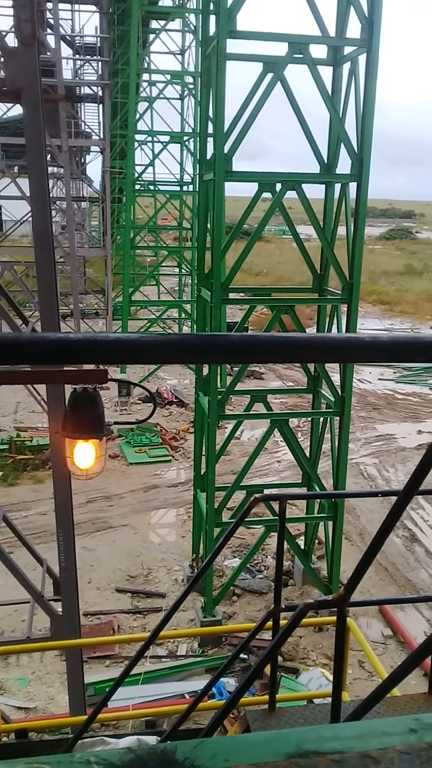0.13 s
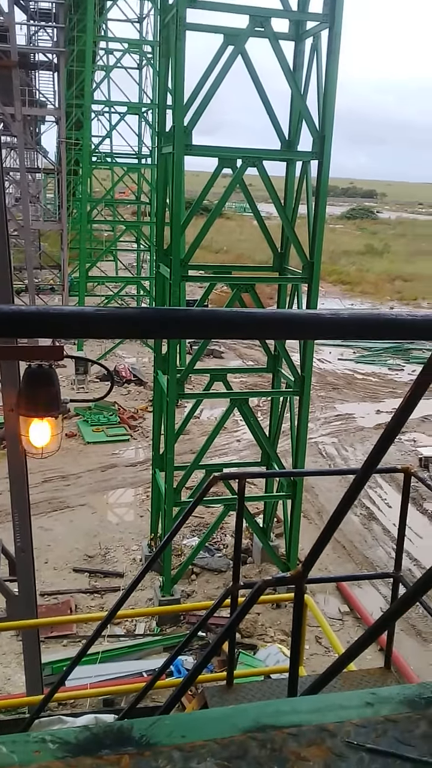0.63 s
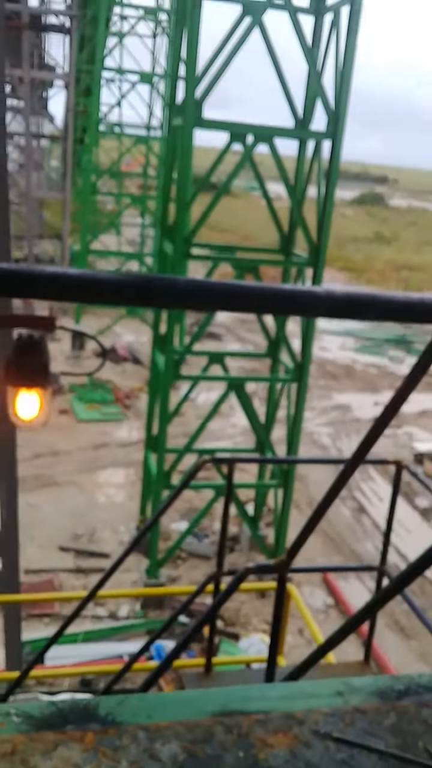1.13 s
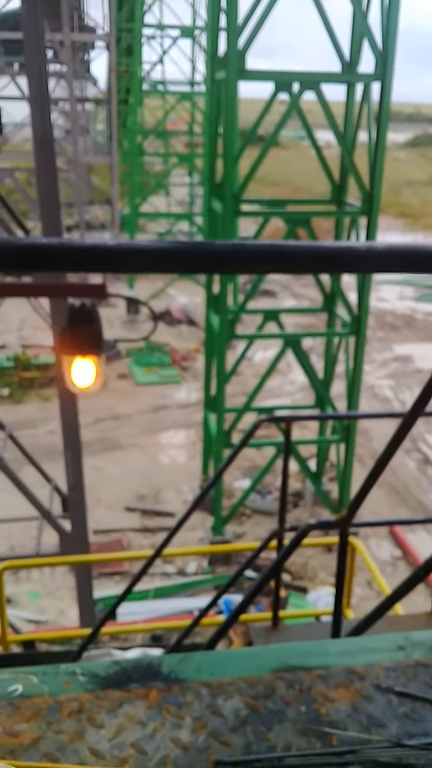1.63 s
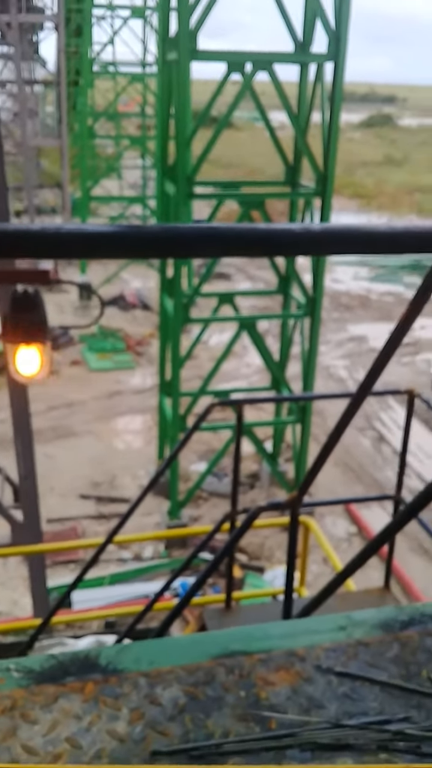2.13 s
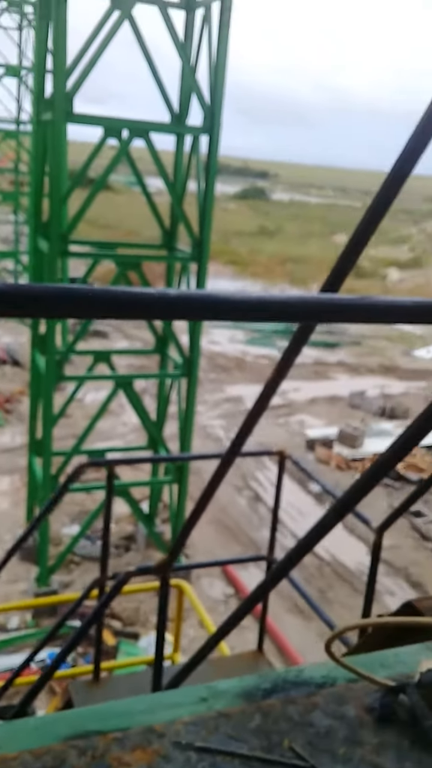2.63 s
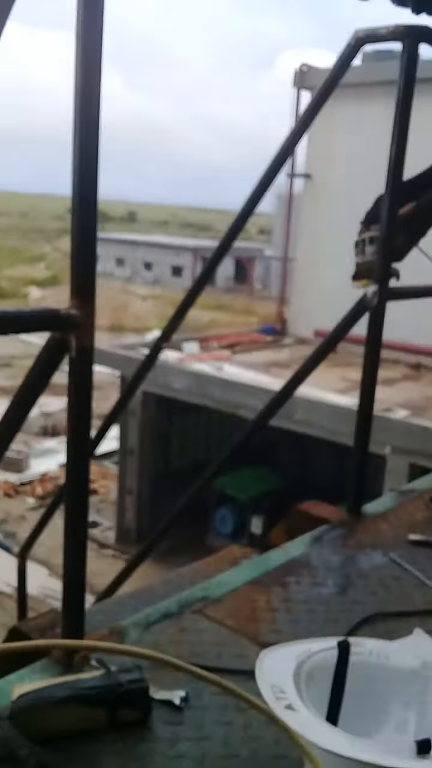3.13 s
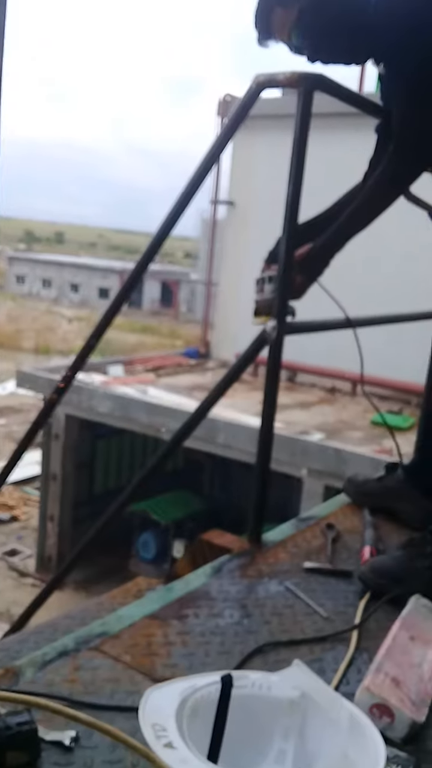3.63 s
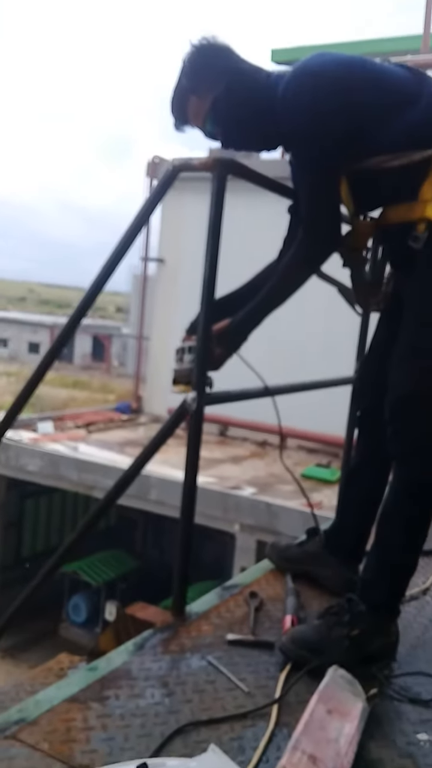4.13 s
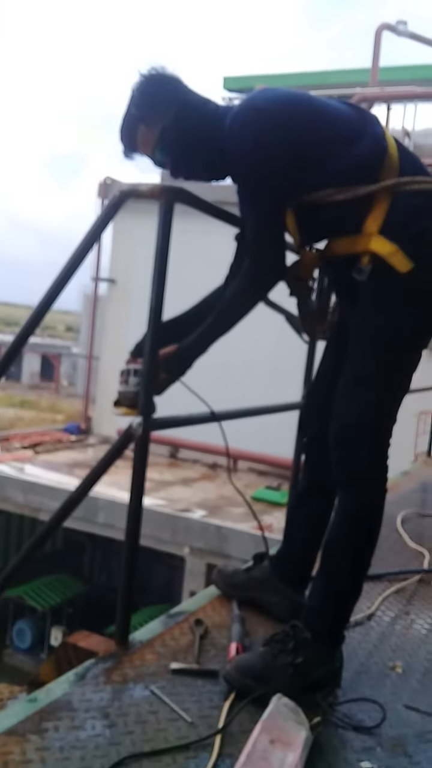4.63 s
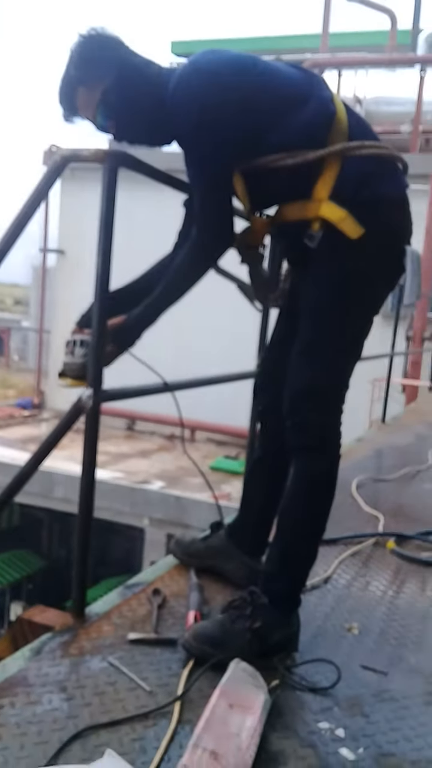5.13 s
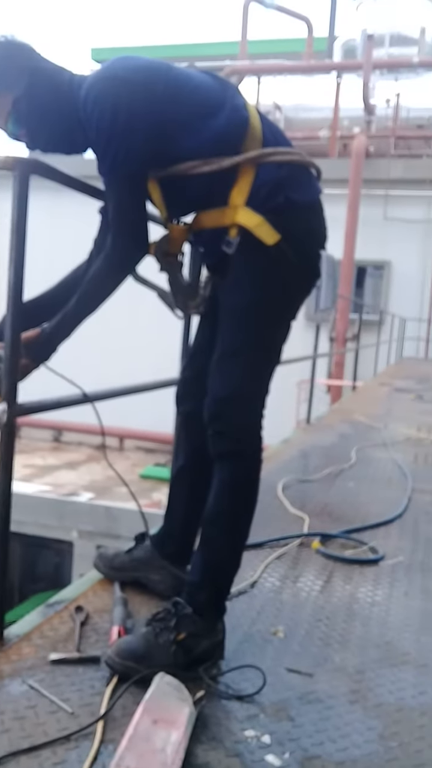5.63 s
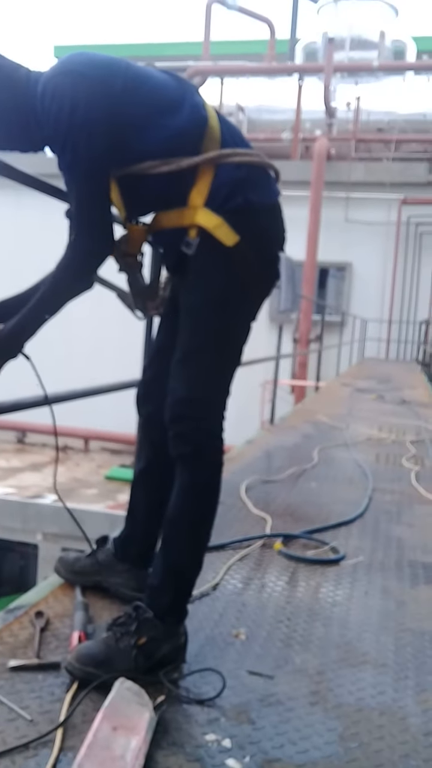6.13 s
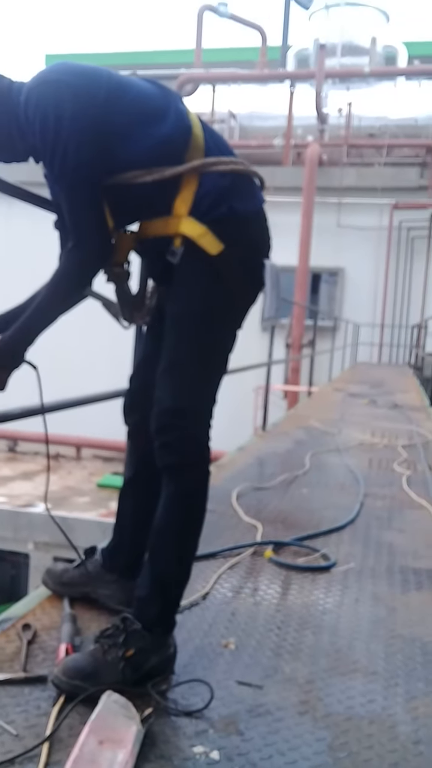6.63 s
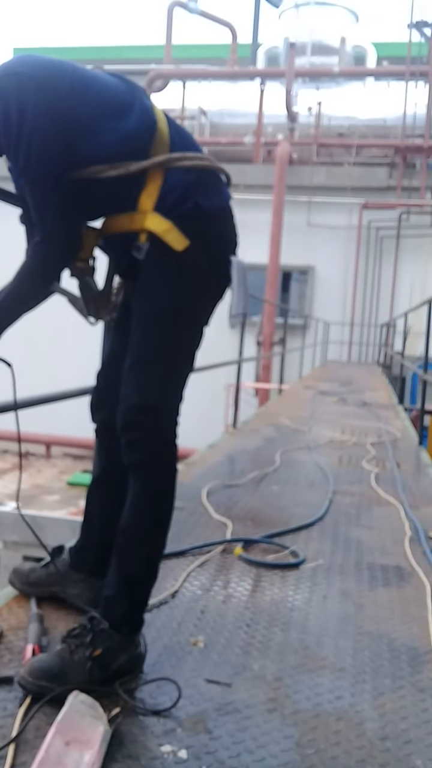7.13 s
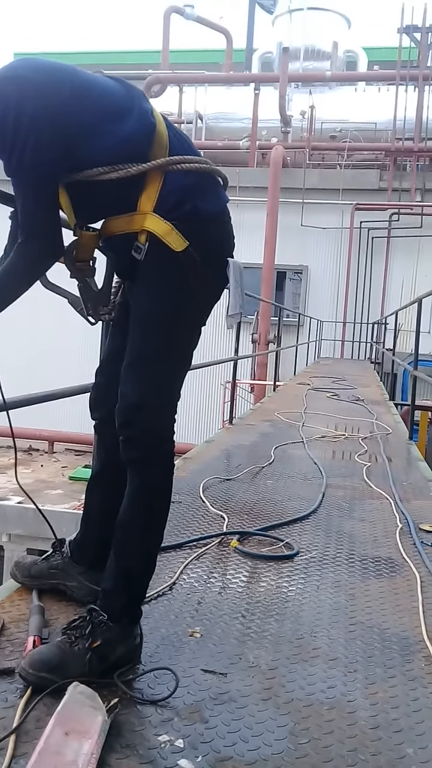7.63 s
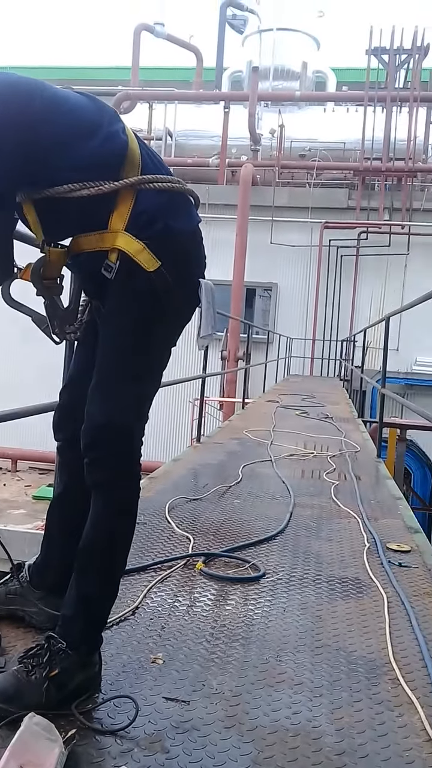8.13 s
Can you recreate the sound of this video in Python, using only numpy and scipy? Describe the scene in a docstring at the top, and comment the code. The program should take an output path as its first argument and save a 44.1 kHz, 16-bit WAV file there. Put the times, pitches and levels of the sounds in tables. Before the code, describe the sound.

A steady, bright rush of grinder fan air fills the foreground, with a piercing whine that sags under load and climbs back when freed. Gritty metallic scrapes ring a steel rail: crowded at the start, sparse after two seconds, rapid dabs from four to under six, then bursts near seven and at the end. Distant machinery rumbles below. The hiss changes colour as the close outdoor microphone turns; sound is identical in both channels.

```python
"""An angle grinder dresses a steel handrail on an open platform: touches crowd the first 0.8 s, return near
1.4-2.1 s, thicken again at 4.1-5.7 s and come in bursts to the end. Each makes the rail ring at multiples of
the disc's turn, while the speed sags and recovers and locks whistle, gear tones and squeal together. The fan's
hiss, shaped noise, changes colour as the one microphone pans from behind the tool to past it. Plant rumble and
hums, noise and sines, lie below throughout; the whole is close to overload."""
import sys
import numpy as np
from scipy import signal
from scipy.fft import rfft, irfft, next_fast_len
from scipy.io import wavfile
from scipy.ndimage import uniform_filter1d

SR = 44100
rng = np.random.default_rng(int(sys.argv[2]) if len(sys.argv) > 2 else 0)


def materialize(psi):
    """Save the field psi as 16-bit PCM at rate SR to the path in sys.argv[1].

    A 1-D psi becomes a single channel; in a 2-D psi each row is a channel.
    """
    bounded = np.clip(np.atleast_2d(psi).T, -1, 1)
    quanta = np.round(bounded * 32767).astype(np.int16)
    wavfile.write(sys.argv[1], SR, quanta)


def nominal_scale(level):
    """Amplitude ratio for a level in decibels (scalar or array-like)."""
    x = np.asarray(level, float) / 20
    return 10 ** x


N = 363825
TIME = np.arange(N) / SR   # seconds
BLADES, PINION_TEETH, CROWN_TEETH = 23, 10, 39   # fan blades, and the gears from rotor to disc
# upper limits of squeal, whistle, overtone and upper ring; sizzle lies above: frequency [Hz]
PART_TOPS_HZ = [3400, 4300, 6600, 8600]


def rms_one(x):
    """Scale to unit power."""
    return x / np.sqrt(np.mean(x ** 2) + 1e-20)


def in_time(rows):
    """Draw each column of a time table as a curve with a value at every sample."""
    seconds, *columns = np.transpose(rows)
    return np.array([np.interp(TIME, seconds, column) for column in columns])


def drift(rate):
    """Slow random wander of spread 1: noise through two equal one-pole low-passes at rate [Hz]."""
    every = 40   # samples between computed points
    r = np.exp(-2 * np.pi * rate * every / SR)
    noise = rng.standard_normal(N // every + 2002)
    slow = signal.lfilter([1], [1, -2 * r, r * r], noise)[2000:]   # leave out the filter's start
    return np.interp(np.arange(N) / every, np.arange(len(slow)), rms_one(slow))


def coloured(white, spectrum):
    """Shape noise in the spectrum by (frequency [Hz], level [dB]) points, straight over log frequency."""
    hz, db = np.transpose(spectrum)
    size = next_fast_len(N)
    bins_hz = np.maximum(np.arange(size // 2 + 1) * SR / size, 1)
    gain = nominal_scale(np.interp(np.log(bins_hz), np.log(hz), db))
    return irfft(rfft(white, size) * gain, size)[:N]


def resonance(x, hz, width_hz):
    """Two-pole band with gain 1 on top; a narrower band rings longer."""
    r = np.exp(-np.pi * width_hz / SR)
    poles = [1, -2 * r * np.cos(2 * np.pi * hz / SR), r * r]
    return signal.lfilter([(1 - r * r) / 2, 0, (r * r - 1) / 2], poles, x)


def tone(turns, waver_db, rate):
    """A sine of rms 1, one cycle per turn, whose level then wavers."""
    sine = np.sqrt(2) * np.sin(2 * np.pi * (turns + rng.random()))
    return sine * nominal_scale(waver_db * drift(rate))


def rotor():
    """Turns of the rotor: its inertia makes the speed creep towards what the load allows."""
    # the load changes in steps; each sets the pitch headed for: (time [s], blade pitch [Hz])
    load_steps = [(0, 13335), (0.36, 14332), (0.45, 13420), (0.71, 14665), (1.39, 14057), (1.6, 13517),
                  (2.07, 14608), (2.6, 14683), (2.77, 13896), (2.8, 14270), (3.03, 13678), (3.21, 13997),
                  (3.66, 13651), (3.76, 13848), (4.09, 13670), (4.28, 13593), (4.53, 14003), (4.6, 13341),
                  (4.7, 13549), (4.79, 14027), (4.93, 13441), (5.09, 14276), (5.21, 13426), (5.39, 14516),
                  (5.51, 13660), (5.67, 14599), (5.84, 13707), (5.96, 14584), (6.67, 13385), (6.7, 14346),
                  (6.8, 13781), (7.14, 13567), (7.31, 14633), (7.9, 14219), (8.0, 14435), (8.18, 13739)]
    start_hz, lag_s, wobble_hz = 13350, 0.4, 11
    seconds, goals_hz = np.transpose(load_steps)
    goal_hz = goals_hz[np.searchsorted(seconds, TIME, "right") - 1]
    r = np.exp(-1 / (lag_s * SR))
    blade_hz = signal.lfilter([1 - r], [1, -r], goal_hz, zi=[start_hz])[0]
    blade_hz = blade_hz + wobble_hz * drift(13)
    return np.cumsum(blade_hz) / BLADES / SR


def disc_skip(disc_turns):
    """Force of a fast disc that bounces about every second turn: deeper the faster, but adding no power."""
    turns_per_s = np.gradient(disc_turns) * SR
    depth = np.clip(1.0 * (turns_per_s - 151), 0, 12)   # no skipping below 151 turns per s
    bounces = 2.0 * rng.standard_normal(int(disc_turns[-1]) + 2)
    bounces[::2] += 1.5
    bounce = np.interp(disc_turns, np.arange(len(bounces)), bounces - .75)
    skip = nominal_scale(2 * depth * np.tanh(bounce))
    return skip / np.sqrt(uniform_filter1d(skip ** 2, size=800))   # share out the power over 800 samples


def pressure(disc_turns, edge_s=0.0084):
    """Drive of the five parts of the squeal: on during each touch, with soft edges, and skipping."""
    # disc on rail: (start [s], end [s], squeal drive [dB], overtone drive [dB], upper ring drive [dB])
    touches = [(0, 0.101, -18, -23, -16.5), (0.101, 0.182, -21, -25, -20.5), (0.2, 0.27, -24, -24, -26),
               (0.272, 0.352, -19, -25, -18), (0.365, 0.604, -27, -26.5, -26),
               (0.602, 0.706, -22, -36.5, -19), (0.72, 0.778, -22, -37, -25),
               (1.417, 1.494, -19.5, -28, -21), (1.564, 1.63, -18, -34, -27),
               (1.642, 1.797, -16.5, -30, -19.5), (1.79, 1.858, -17.5, -32, -25),
               (1.874, 1.938, -21, -28, -26), (1.948, 2.0, -14, -29, -21), (1.997, 2.1, -23, -29, -21.5),
               (2.79, 2.817, -26, -17, -24), (2.907, 3.07, -23.5, -28, -30), (3.36, 3.452, -25, -35, -24.5),
               (3.657, 3.692, -30, -26, -24), (3.74, 3.81, -28, -20, -26), (4.088, 4.123, -20, -23, -30),
               (4.163, 4.224, -23.5, -30, -43), (4.277, 4.374, -21, -31, -37), (4.38, 4.48, -16, -27, -31),
               (4.474, 4.546, -19, -32, -40), (4.615, 4.637, -22, -22, -31), (4.66, 4.73, -28, -20, -40),
               (4.728, 4.791, -18, -21, -37), (4.939, 4.963, -20, -30, -30), (5.054, 5.092, -14, -24, -33),
               (5.115, 5.16, -24, -28, -42), (5.183, 5.23, -19, -31, -40), (5.36, 5.388, -16, -22, -32),
               (5.5, 5.54, -19.5, -19, -38), (5.656, 5.679, -20, -19, -33), (6.667, 6.71, -15.5, -33, -33),
               (6.958, 6.977, -12.5, -34, -21), (6.987, 7.05, -14.5, -20.5, -20.5),
               (7.064, 7.158, -16, -37, -27), (7.184, 7.23, -16, -35, -24), (7.241, 7.34, -15.5, -19, -24),
               (7.918, 7.963, -22, -20, -32), (7.981, 7.995, -14, -32, -24), (8.009, 8.015, -9, -20, -25),
               (8.034, 8.187, -18.5, -17.5, -26), (8.187, 8.248, -17, -21, -29)]
    ring_reference_db = -28
    drive = np.zeros((len(PART_TOPS_HZ) + 1, N))
    for start, end, squeal_db, overtone_db, ring_db in touches:
        # whistle and sizzle follow the upper ring; the whistle also gains what the overtone lacks
        swing_db = ring_db - ring_reference_db
        whistle_db = -38 + swing_db + 0.56 * (ring_reference_db - overtone_db)
        sizzle_db = -30.5 + 0.53 * swing_db
        levels_db = [squeal_db, whistle_db, overtone_db, ring_db, sizzle_db]
        drive[:, round(start * SR):round(end * SR)] = nominal_scale(levels_db)[:, None]
    felt = np.array([0.68, 0.73, 0.43, 0.86, 0.76])[:, None]   # the low modes ring on between bounces
    return uniform_filter1d(drive, round(edge_s * SR), axis=1) * disc_skip(disc_turns) ** felt


def disc_rim(disc_turns):
    """Bumps around the rim repeat every turn and so make a comb of lines."""
    # bumps around the rim: order [times a turn]
    rim_orders = range(12, 83)
    # bumps that stand out or stay small: order [times a turn]
    odd_orders = [14, 15, 16, 17, 18, 24, 25, 26]
    # their heights against the rest: level [dB]
    odd_db = [-2, 1, 2, -4, -13, 3, 3, -1.5]
    heights_db = dict(zip(odd_orders, odd_db))
    return sum(nominal_scale(heights_db.get(order, 0)) * tone(order * disc_turns, waver_db=2.0, rate=7.3)
               for order in rim_orders)


def loose_grit(disc_turns, high_spot=0.55):
    """Spiky noise that swells once a turn, at the disc's high spot."""
    spiky = rng.standard_normal(N) * nominal_scale(0.55 * rng.exponential(1, N))
    return rms_one(spiky * (1 + high_spot * np.cos(2 * np.pi * disc_turns)))


def grinding(disc_turns):
    """Rim bumps and loose grit drive the rail, whose modes pick out lines of the comb."""
    # modes the rail rings with: (frequency [Hz], width [Hz], level [dB])
    rail_modes = [(1990, 86, -8.5), (2442, 290, 0), (2840, 38, -8), (3880, 95, 6.5), (4890, 230, -1),
                  (6010, 130, -4), (7350, 1200, -15), (7526, 630, -6), (8000, 180, -30), (8160, 220, -11.5),
                  (9470, 330, -5), (9290, 320, -11), (10640, 220, -3.5), (11080, 380, -10),
                  (11700, 520, -4.5), (12200, 390, -30)]
    # shares in squeal, whistle, overtone, upper ring and sizzle [dB]
    grit_db, rim_db = (-9, -13, -3, -4, -4), (-1.5, -1.5, -3, -4, -3)
    drive = pressure(disc_turns)
    grit, rim = loose_grit(disc_turns), disc_rim(disc_turns)
    out = np.zeros(N)
    for hz, width_hz, level_db in rail_modes:
        part = np.searchsorted(PART_TOPS_HZ, hz)
        # a narrow mode passes less noise: make up for it
        grit_rub = nominal_scale(grit_db[part]) * grit * np.sqrt(SR / (np.pi * width_hz))
        rub = drive[part] * (grit_rub + nominal_scale(rim_db[part]) * rim)
        # twice through the mode: little sounds between the modes
        ring = resonance(resonance(rub, hz, width_hz), hz, width_hz)
        # the upper modes change with the spot that is ground
        shift_db = 2.2 * drift(2.0) if part > 2 else 0
        out += nominal_scale(level_db + shift_db) * ring
    return out


def motor(rotor_turns):
    """Blade whistle, unbalance, a ninth order and the gear mesh, all locked to the rotor."""
    # whistle of the fan blades: (time [s], level [dB])
    whistle_levels = [(0, -24.5), (.7, -22), (.85, -31), (1.06, -24), (1.19, -30), (1.3, -31), (1.9, -26),
                      (2.16, -21), (2.3, -35), (2.45, -25), (2.85, -21), (2.95, -32), (3.15, -19),
                      (3.42, -27), (3.62, -17), (3.87, -25), (4.02, -17), (4.3, -24), (4.9, -21),
                      (5.65, -20), (5.95, -25), (6.12, -14.5), (6.37, -25), (6.5, -17), (6.93, -18),
                      (7.25, -25), (7.37, -22), (7.55, -24), (7.7, -22), (8.25, -31)]
    # rotor tones: (time [s], once a turn [dB], nine a turn [dB], gear mesh [dB])
    rotor_levels = [(0, -46, -47, -47), (.9, -51, -41, -44), (1.4, -55, -30, -46), (2.0, -43, -44, -32),
                    (2.6, -39, -31, -42), (3.4, -37, -30.5, -34), (4.1, -38.5, -25, -50),
                    (4.5, -41, -26, -28), (5.1, -39, -27, -30.5), (6.2, -38, -40, -46),
                    (7.5, -40, -27, -38), (8.25, -54, -55, -44)]
    whistle_db = in_time(whistle_levels)[0]
    once_db, ninth_db, mesh_db = in_time(rotor_levels)
    out = nominal_scale(whistle_db) * tone(BLADES * rotor_turns, waver_db=2.0, rate=12)
    out += nominal_scale(once_db) * tone(rotor_turns, waver_db=2.0, rate=8.0)
    out += nominal_scale(ninth_db) * tone(9 * rotor_turns, waver_db=3.0, rate=6)
    out += nominal_scale(mesh_db) * tone(PINION_TEETH * rotor_turns, waver_db=5.0, rate=5.3)
    return out


def band_filter(x, edge_hz, kind):
    """Second-order filter run forwards and backwards, so that nothing is delayed."""
    return signal.sosfiltfilt(signal.butter(2, edge_hz, kind, fs=SR, output="sos"), x)


def fan_rush():
    """One noise, blended from colour to colour as the microphone turns."""
    # colours heard behind, away from, turning to, facing and past the tool:
    # one list each of (frequency [Hz], level per Hz [dB])
    colours = [
        [(470, -41), (800, -11.5), (1030, -6.5), (1530, -2), (1760, -7), (2330, -3), (3140, -6), (4720, 1),
         (6020, -12.5), (7680, -2.5), (8730, -12), (12800, -6), (16000, -17)],
        [(470, -30), (800, -13.5), (1080, -6), (1600, 0), (1930, -8.5), (2490, 0.5), (3290, 1.5), (4110, 0),
         (5550, 4.5), (7770, -16), (12800, -13.5), (16000, -13.5)],
        [(470, -62), (800, -19), (1130, -10), (1330, -13), (1530, -6), (1640, -25), (1780, -8), (2120, -4),
         (3220, -3.5), (4770, -5), (5360, -0.5), (6100, -2.5), (7510, -20), (8530, -24.5), (12800, -19),
         (16000, -23)],
        [(470, -30), (800, -15.5), (1170, -7.5), (1480, -13), (1890, -1.5), (2380, -7.5), (2900, 2.5),
         (3180, -2.5), (4700, -0.5), (5240, 0.5), (6090, 0.5), (6530, -13.5), (8430, -20), (12800, -14),
         (16000, -12.5)],
        [(470, -46), (800, -8.5), (1320, -4.5), (1510, -6), (1870, -1.5), (2900, 5), (3180, -2), (3490, 5),
         (4250, -2.5), (4560, 4.5), (5620, 3), (6380, -10.5), (8330, -25), (12800, -24.5), (16000, -24)],
    ]
    # how far the microphone has turned: (time [s], place among the colours [0 behind - 4 past])
    aim_curve = [(0, 0.11), (.7, 0.12), (1.1, 1), (1.8, 1), (2.5, 1.64), (3.3, 2), (4.0, 2.56), (4.8, 3),
                 (6.2, 3.21), (7.6, 3.67), (8.25, 3.9)]
    aim = in_time(aim_curve)[0]
    white = rng.standard_normal(N)
    return sum(np.maximum(1 - abs(aim - place), 0) * rms_one(coloured(white, colour))
               for place, colour in enumerate(colours))


def air(flutter_db=0.46, patchy_db=1.36, deck=0.13, wall=0.12):
    """Fan rush: two short echoes comb its body, and bands of its treble swell each on its own."""
    # air rush: (time [s], level [dB], treble gain above 6.6 kHz [dB])
    air_levels = [(0.0, -13.5, -7), (0.76, -13, -14), (1.06, -14, 0.5), (2.34, -14.5, 1.5), (2.73, -13, 1),
                  (4.2, -11, -3), (4.4, -12.5, -1), (5.83, -11, -2), (6.25, -12, 0), (7.14, -12.5, 1.5),
                  (7.61, -14.5, 2), (8.25, -15.5, 7)]
    # edges of the treble bands: frequency [Hz]
    treble_edges = [6600, 8000, 9500, 11200, 13200, 15000, 17500]
    # echo lags: (time [s], deck [ms], wall [ms])
    echo_lags = [(0, 0.91, 1.37), (2, 0.88, 2.4), (3, 0.88, 1.5), (4, 0.95, 1.85), (5, 1.08, 1.9),
                 (6, 1.14, 1.82), (7, 1.16, 1.5), (8.25, 1.04, 1.6)]
    level_db, treble_db = in_time(air_levels)
    deck_ms, wall_ms = in_time(echo_lags)
    rush = fan_rush()
    treble = sum(band_filter(rush, band, "band") * nominal_scale(patchy_db * drift(5.4))
                 for band in zip(treble_edges, treble_edges[1:]))
    direct = band_filter(rush, treble_edges[0], "low")
    deck_echo = deck * np.interp(TIME - deck_ms / 1000, TIME, direct)
    wall_echo = wall * np.interp(TIME - wall_ms / 1000, TIME, direct)
    body = (direct + deck_echo + wall_echo) * nominal_scale(flutter_db * drift(16))
    return nominal_scale(level_db) * (body + treble * nominal_scale(treble_db + flutter_db * drift(8.5)))


def hiss_bands():
    """Narrow bands of hiss that stand out for a while: noise twice through a resonance, swelling once."""
    # bands: (start [s], end [s], frequency [Hz], width [Hz], level at the height of the swell [dB])
    swells = [(0.75, 1.4, 3400, 600, -22.5), (2.3, 3.3, 4720, 450, -19.5), (2.9, 3.7, 5400, 550, -24),
              (3.6, 4.7, 4820, 250, -19), (4.3, 5.7, 4600, 250, -21), (4.2, 6.4, 2875, 250, -26.5),
              (5.1, 6.3, 5300, 200, -27)]
    out = np.zeros(N)
    for start, end, hz, width_hz, level_db in swells:
        noise = rng.standard_normal(N)
        band = rms_one(resonance(resonance(noise, hz, width_hz), hz, width_hz))
        swell = np.sin(np.pi * np.clip((TIME - start) / (end - start), 0, 1))
        out += nominal_scale(level_db) * swell * band
    return out


def plant():
    """Far machinery: noise shaped into rumble, three wavering hums and faint tones."""
    # plant: (time [s], rumble [dB], hum [dB], second hum [dB], high hum [dB])
    plant_levels = [(0, -28.5, -35.5, -35, -51), (.7, -27, -37.5, -37.5, -46), (.92, -24, -41, -35, -34),
                    (1.1, -26.5, -37, -38, -45), (2.05, -28.5, -38.5, -40, -49),
                    (2.25, -25.5, -29.5, -31.5, -43), (2.55, -28, -41, -37, -41.5),
                    (3.9, -28, -37, -38, -36), (4.8, -28, -37.5, -42, -62), (6.5, -27.5, -37.5, -45, -47),
                    (7.6, -28.5, -40.5, -52, -50), (8.25, -31, -41, -50, -52)]
    # colour of the rumble: (frequency [Hz], level per Hz [dB])
    rumble_colour = [(15, -56), (25, -38), (84, -4), (139, 0), (189, -1.5), (226, 0), (543, -3.5),
                     (750, -2), (941, -12.5), (1070, -2), (1200, -7), (1560, -18), (2640, -120)]
    # pitches of the three hums: frequency [Hz]
    hum_pitches = [150.5, 220.7, 748.3]
    # faint tones: (frequency [Hz], level [dB])
    faint_tones = [(113, -48), (882.9, -47.5)]
    rumble_db, *hums_db = in_time(plant_levels)
    out = nominal_scale(rumble_db) * rms_one(coloured(rng.standard_normal(N), rumble_colour))
    for hz, level_db in zip(hum_pitches, hums_db):
        out += nominal_scale(level_db) * tone(hz * TIME, waver_db=1.5, rate=3.0)
    for hz, level_db in faint_tones:
        out += nominal_scale(level_db) * tone(hz * TIME, waver_db=2.0, rate=2.1)
    return out


def scene():
    """Grinder and plant, alike in both channels."""
    rotor_turns = rotor()
    disc_turns = rotor_turns * PINION_TEETH / CROWN_TEETH
    mix = grinding(disc_turns) + motor(rotor_turns) + air() + hiss_bands() + plant()
    return np.array([mix, mix])


def top_cut(x):
    """Nothing passes above the cut-off."""
    return signal.sosfilt(signal.butter(12, 15880, fs=SR, output="sos"), x)


def record(dry):
    """Peaks beyond full scale are clipped flat."""
    mix = np.clip(dry, -1, 1)
    return top_cut(mix)


dry = scene()
out = record(dry)
materialize(out)
```